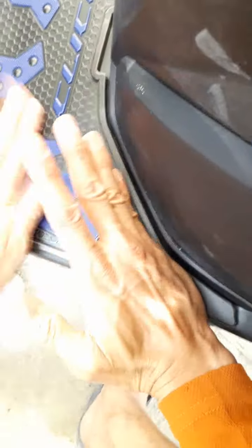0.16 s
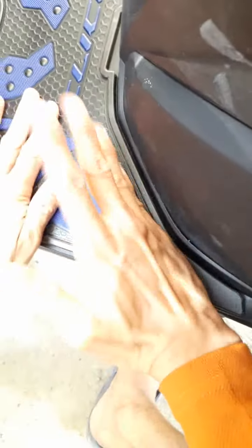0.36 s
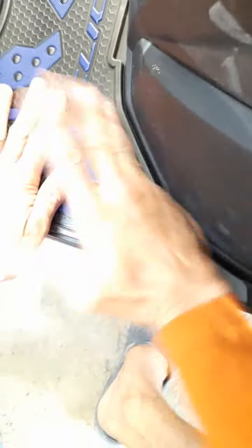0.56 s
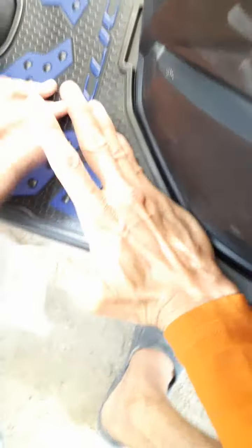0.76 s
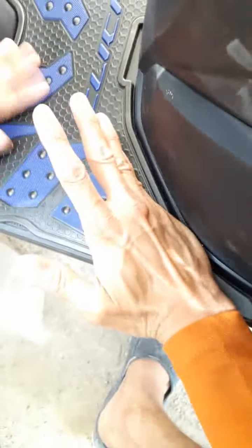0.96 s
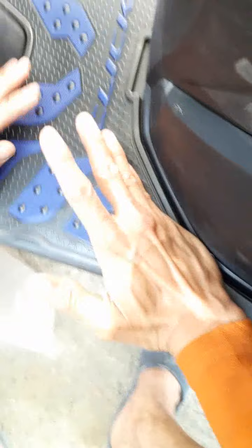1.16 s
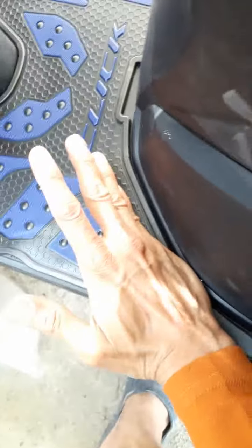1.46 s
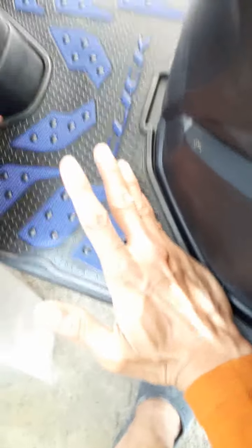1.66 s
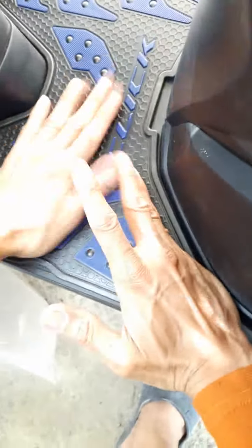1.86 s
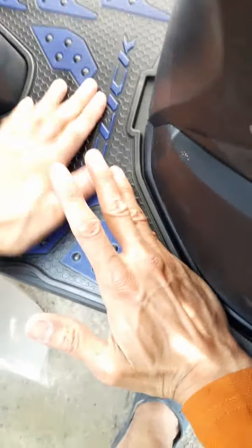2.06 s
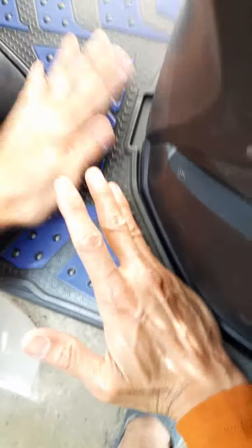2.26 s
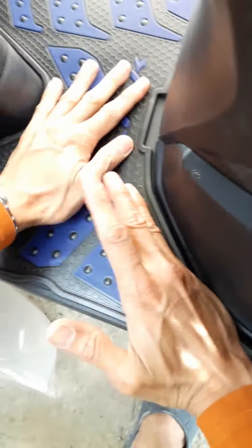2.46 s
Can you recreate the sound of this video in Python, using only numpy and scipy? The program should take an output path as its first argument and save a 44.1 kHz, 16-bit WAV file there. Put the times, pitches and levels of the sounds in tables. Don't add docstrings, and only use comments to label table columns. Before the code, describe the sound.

Uneven hand smacks on a studded rubber mat, cracking and popping over a briefly booming hollow board

```python
import sys
import numpy as np
from scipy import signal
from scipy.fft import rfft, irfft, next_fast_len
from scipy.io import wavfile
from scipy.ndimage import uniform_filter1d, map_coordinates

SR = 44100
rng = np.random.default_rng(int(sys.argv[2]) if len(sys.argv) > 2 else 0)


def volts_from_db(level):
    exponent = np.asarray(level, float) / 20
    return 10 ** exponent


def wrap_up_sound(samples):
    columns = np.atleast_2d(samples).T
    tamed = np.clip(columns, -1, 1)
    steps = np.round(tamed * 32767).astype(np.int16)
    wavfile.write(sys.argv[1], SR, steps)


N = 114660

# hz, level_db
AIR_COLOUR = [(25, -22), (60, 2), (150, -1.5), (300, -5), (550, -5.5), (800, -12.5), (3500, -16),
              (16000, -28)]
AIR_DB = -58
# multiple, level_db
MOTOR_HARMONICS = [(1, -50.5), (1.5, -63), (2, -66.5), (3, -66), (3.5, -61.5)]
MOTOR_HZ = 86.3
# time_s, level_db
ARM_MOVEMENT = [(0.0, -48), (0.11, -51.5), (0.22, -53), (0.35, -52), (0.42, -67.5), (0.86, -70),
                (1.04, -67.5), (1.17, -72.5), (1.29, -75), (1.4, -61), (1.52, -57.5), (1.8, -56),
                (1.87, -52), (2.03, -60), (2.6, -64.5)]
# hz, level_db
CLOTH_COLOUR = [(60, -18.5), (130, -10), (300, -0.5), (600, -10.5), (1500, -15), (4000, -18), (8000, -19.5),
                (16000, -19)]
RUSTLE_DB = 6.5

# start_s, length_s, level_db, centre_hz
SKIN_RUBS = [(0.02, .11, -52, 5000), (.06, .02, -56, 13000), (.24, .008, -48, 10000),
             (0.3, .075, -56, 5500), (.305, .008, -55, 9000), (0.868, 0.02, -60, 3500),
             (1.063, 0.022, -55, 3800), (1.105, 0.018, -58.5, 3500), (1.135, 0.027, -53.5, 3500),
             (1.183, .012, -62, 3400), (1.323, .035, -52, 13000), (1.35, .025, -43, 12000),
             (1.355, 0.007, -42, 4200), (1.36, 0.011, -39, 3900), (1.361, 0.008, -44, 7360),
             (1.402, 0.018, -46, 7500), (1.403, .016, -48, 13000), (1.43, .008, -51, 13500),
             (1.438, .008, -52, 2200), (1.448, .007, -52, 13000), (1.505, .012, -61, 3970),
             (1.585, 0.04, -49, 3700), (1.59, .02, -53, 13000), (1.615, .05, -51, 1150),
             (1.612, 0.036, -44, 3650), (1.62, .04, -54, 2300), (1.64, 0.024, -51, 6000),
             (1.642, 0.024, -45, 4350), (2.03, .01, -60, 7600), (2.447, .007, -53, 12230),
             (2.464, 0.0055, -54, 14200), (2.481, .006, -54, 13160), (2.518, .012, -56.5, 12500)]
RUB_SHARPNESS, RUB_BROAD_SHARE = 3.4, 0.24

# hz, t60_s
BODYWORK_DECAY = [(200, .25), (1000, 0.22), (4000, 0.19), (12000, 0.18)]
# hz, level_db
ECHO_COLOUR = [(100, -2), (300, 2.5), (1000, -3.5), (4000, -9), (16000, -19.5)]
BODYWORK_DB = -9.5
YARD_DB, YARD_T60_S = -17, 0.78

# pitch_hz, level_db, t60_s
BOARD_MODES = [(50, -16.5, .15), (100, -18, 0.12), (131, -14.5, 0.13), (170.6, -12.5, 0.1),
               (202.1, -7.5, 0.12), (232.9, -7.5, 0.18), (257.5, -0.5, 0.15), (291.6, -0.5, .08),
               (353.4, -6, 0.12), (454, -13.5, 0.18), (547, -8.5, .09), (749, -4.5, 0.085),
               (1030, -15, 0.059), (1382, 0.5, .05)]
# start_s, level_db, contact_s
PALM_PUSHES = [(0.1831, -6.5, 0.001), (0.197, -14.5, 0.00061), (0.2028, -11.5, 0.00069),
               (0.2116, -7.5, 0.002), (0.2171, -8, 0.0019), (0.2217, -8, 0.0015), (0.57, -26, 0.0012),
               (0.5854, -25, 0.002), (.59, -21, 0.0044), (1.398, -23.5, 0.0071), (0.6247, -30.5, 0.0039),
               (.64, -23, 0.007), (0.965, -25, 0.0018), (0.978, -22.5, 0.0043), (.995, -17, 0.006),
               (1.353, -35, 0.0013), (1.372, -25, 0.00082), (1.3821, -18, 0.0011), (1.395, -31, 0.0024),
               (1.441, -33, 0.0026), (1.865, -23, 0.00074), (1.8758, -9, 0.0016), (1.8791, -10.5, 0.0015),
               (1.894, -27, 0.0023), (1.943, -27, 0.0032), (2.2931, -21, 0.0013), (2.2976, -17.5, 0.0015),
               (2.309, -28, 0.0018), (2.327, -26.5, .002), (2.402, -41, 0.00085)]
CHATTER_DB = -38
FLUTTER_DB = 1.6
LOW_CUT_HZ = 94

# start_s, level_db, centre_hz, t60_s
SKIN_CONTACTS = [(0.1793, -29, 3950, 0.081), (0.1826, -12.5, 4000, 0.09), (0.187, -13.5, 2012, 0.095),
                 (.193, -16.5, 1556, 0.16), (.198, -23.5, 2470, 0.076), (0.2044, -11, 3575, 0.04),
                 (0.212, -22, 3000, 0.11), (0.217, -16.5, 1430, 0.057), (.5677, -28, 3580, 0.057),
                 (.5702, -29, 1470, 0.083), (0.5762, -25.5, 2860, 0.039), (.586, -34, 1200, 0.011),
                 (0.9563, -32.5, 3520, 0.068), (0.9581, -25, 2340, 0.038), (0.9667, -30.5, 4000, 0.022),
                 (0.976, -25, 11600, .025), (1.3688, -27, 4180, 0.019), (1.372, -25, 1960, 0.098),
                 (1.383, -30, 1420, 0.047), (1.8647, -8.5, 4700, 0.061), (1.8655, -9.5, 12200, 0.043),
                 (1.8674, -12, 2220, 0.046), (1.8775, -24, 3250, 0.094), (2.2905, -21.5, 9100, 0.053),
                 (2.291, -20, 3710, 0.05), (2.293, -19, 2750, 0.055), (2.2975, -31, 2530, 0.0155),
                 (2.568, -44.5, 3500, 0.03), (2.568, -44, 12200, 0.029), (0.5686, -36, 13100, 0.086),
                 (.96, -36, 13100, 0.077), (1.376, -26.5, 2480, 0.013)]
# hz, level_db
CRACK_COLOUR = [(150, -22.5), (400, 16), (1500, 3.5), (4000, -1.5), (8000, -2.5), (11000, -4.5),
                (16000, -6)]
# start_s, level_db, pitch_hz, t60_s
AIR_POPS = [(.5704, -16, 987, 0.011), (0.5772, -11.5, 2520, 0.0073), (0.5703, -16.5, 2620, 0.009),
            (.9568, -21, 3900, .026), (.9578, -19, 2450, .024), (.9586, -22.5, 977, 0.021),
            (1.3686, -8, 3250, .005), (1.36922, -1, 3300, .0035), (1.3695, -20, 2500, .03),
            (.9672, -26.5, 4230, 0.023), (.9678, -22.5, 3540, 0.014), (1.8658, -7.5, 4300, 0.012),
            (1.8657, -11, 1285, 0.059), (2.2928, -14, 1400, .03), (2.2932, -15, 3650, .02),
            (0.2045, -11, 4800, 0.008), (.2043, -13.5, 5000, .01), (.1825, -10.5, 4000, 0.051),
            (.2105, -7.5, 550, .008), (2.2965, -19, 2570, 0.029)]
RISE_S, LEAD_S, LEAD_DB = 0.0005, 0.0013, -19.5
CRACK_SHARPNESS, CRACK_BROAD_DB, GRAIN_DB = 0.83, -12, 2.5

# hz, level_db
CHANNEL_DIFFERENCE = [(4000, -48), (8000, -24.5), (13000, -13.5)]
# hz, level_db
MICROPHONE_RESPONSE = [(30, -12), (150, -1), (7500, -1), (9200, -6.5), (10400, -16.5), (11800, -8.5),
                       (15000, -11.5)]
TOP_HZ = 15800
CLIP_LEVEL = 1.1


def unit(x):
    return x / np.sqrt(np.mean(x ** 2) + 1e-20)


def along(points, hz):
    f, value = np.transpose(points)
    return np.interp(np.log(hz + 1), np.log(f + 1), value)


def wobble(rate, count):
    return map_coordinates(rng.standard_normal(SR // 8), [np.arange(count) * rate / SR])


def filtered(x, response):
    m = next_fast_len(len(x) + 4096)
    spectrum = rfft(x, m) * response(np.fft.rfftfreq(m, 1 / SR))
    return irfft(spectrum, m)[:len(x)]


def peak(f, hz, width_hz):
    return 1j * f * width_hz / (hz * hz - f * f + 1j * f * width_hz)


def add(track, start_s, x):
    part = track[round(start_s * SR):][:len(x)]
    part += x[:len(part)]


def hiss(colour):
    return unit(filtered(rng.standard_normal(N), lambda f: volts_from_db(along(colour, f))))


def background():
    air = volts_from_db(AIR_DB + wobble(8, N)) * hiss(AIR_COLOUR)

    time_s, level_db = np.transpose(ARM_MOVEMENT)
    move_db = np.interp(np.arange(N) / SR, time_s, level_db)
    rustle = volts_from_db(move_db + RUSTLE_DB + 1.5 * wobble(35, N)) * hiss(CLOTH_COLOUR)

    phase = 2 * np.pi * np.cumsum(MOTOR_HZ + 2.2 * wobble(6, N)) / SR
    hum = np.zeros(N)
    for multiple, db in MOTOR_HARMONICS:
        hum += volts_from_db(db + 2.0 * wobble(4.1, N)) * np.sin(multiple * phase)
    hum *= volts_from_db(0.48 * (move_db - move_db.mean()))
    return air + rustle + hum


def rubs():
    out = np.zeros(N)
    t = np.arange(SR // 5) / SR
    for start_s, length_s, db, hz in SKIN_RUBS:
        def friction(f):
            return peak(f, hz, hz / RUB_SHARPNESS) ** 2 + RUB_BROAD_SHARE * peak(f, 5000, 14000)
        grit = rng.standard_normal(len(t)) * volts_from_db(3.5 * wobble(300, len(t)))
        swell = np.sin(np.pi * np.clip(t / length_s, 0, 1))
        add(out, start_s, volts_from_db(db) * unit(filtered(grit, friction)) * swell)
    return out


def bodywork(contact):
    hz, t, noise = signal.stft(hiss(ECHO_COLOUR), SR, nperseg=128)
    lag = t[:SR // 128]
    near = volts_from_db(-120 * lag / along(BODYWORK_DECAY, hz)[:, None])
    near = near / near.sum(axis=1, keepdims=True)
    far = volts_from_db(-120 * lag / YARD_T60_S)
    far = volts_from_db(2 * YARD_DB) * far / far.sum() / (1 + hz[:, None] / 1500)
    drive = np.interp(t, np.arange(N) / SR, uniform_filter1d(contact ** 2, size=64))
    power = signal.fftconvolve(drive[None], near + far, axes=1)[:, :len(t)]
    return signal.istft(noise * np.sqrt(np.abs(power)), SR, nperseg=128)[1][:N]


def board(contact):
    force = volts_from_db(CHATTER_DB) * contact * rng.standard_normal(N)
    t = np.arange(SR // 2) / SR
    for start_s, db, contact_s in PALM_PUSHES:
        push = np.sin(np.pi * np.clip(t[:441] / contact_s, 0, 1))
        add(force, start_s, volts_from_db(db) * push / (contact_s * SR))

    ring = np.zeros(len(t))
    for hz, db, t60 in BOARD_MODES:
        ring += volts_from_db(db - 60 * t / t60) * np.cos(2 * np.pi * hz * t)
    boom = volts_from_db(FLUTTER_DB * wobble(45, N)) * signal.fftconvolve(force, ring)[:N]
    return filtered(boom, lambda f: (1j * f / (LOW_CUT_HZ + 1j * f)) ** 2)


def air_pops():
    out = np.zeros(N)
    t = np.arange(SR // 8) / SR
    for start_s, db, hz, t60 in AIR_POPS:
        onset = 1 - np.exp(-t * hz * 2)
        add(out, start_s, volts_from_db(db - 60 * t / t60) * onset * np.sin(2 * np.pi * hz * t))
    return out


def smacks():
    out, power = np.zeros(N), np.zeros(N)
    before_s = 0.01
    t = np.arange(SR // 8) / SR - before_s
    for start_s, db, hz, t60 in SKIN_CONTACTS:
        def colour(f):
            return volts_from_db(along(CRACK_COLOUR, f)) * (peak(f, hz, hz / CRACK_SHARPNESS) ** 2 + volts_from_db(CRACK_BROAD_DB))
        noise = unit(filtered(rng.standard_normal(len(t)), colour))
        rise = 1 / (1 + np.exp(-t / RISE_S * 2))
        rush = volts_from_db(LEAD_DB) * np.exp(-np.abs(t) / LEAD_S)
        shape = volts_from_db(db) * (rise + rush) * volts_from_db(-60 * np.maximum(t, 0) / t60)
        grain = volts_from_db(GRAIN_DB * wobble(700, len(t)))
        add(out, start_s - before_s, shape * grain * noise)
        add(power, start_s - before_s, shape ** 2)
    return out, np.sqrt(power)


def scene():
    cracks, contact = smacks()
    cracks = cracks + air_pops()
    mono = background() + rubs() + volts_from_db(BODYWORK_DB) * bodywork(contact) + board(contact) + cracks
    side = filtered(cracks * np.sign(wobble(1500, N)), lambda f: volts_from_db(along(CHANNEL_DIFFERENCE, f)))
    return np.array([mono + side, mono - side])


def roll_off(x):
    return signal.sosfilt(signal.butter(12, 17000, fs=SR, output="sos"), x)


def record(dry):
    def microphone(f):
        return volts_from_db(along(MICROPHONE_RESPONSE, f)) / (1 + (f / TOP_HZ) ** 150)
    x = np.array([filtered(channel, microphone) for channel in dry])
    x = x / (1 + np.abs(x / CLIP_LEVEL) ** 6) ** (1 / 6)
    return roll_off(x)


dry = scene()
out = record(dry)
wrap_up_sound(out)
```